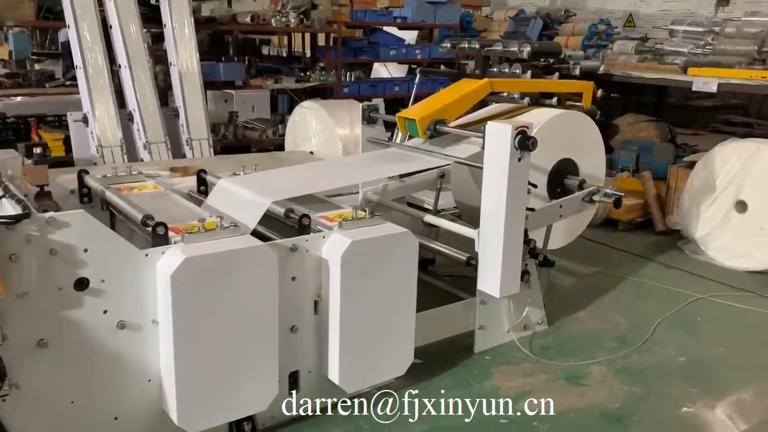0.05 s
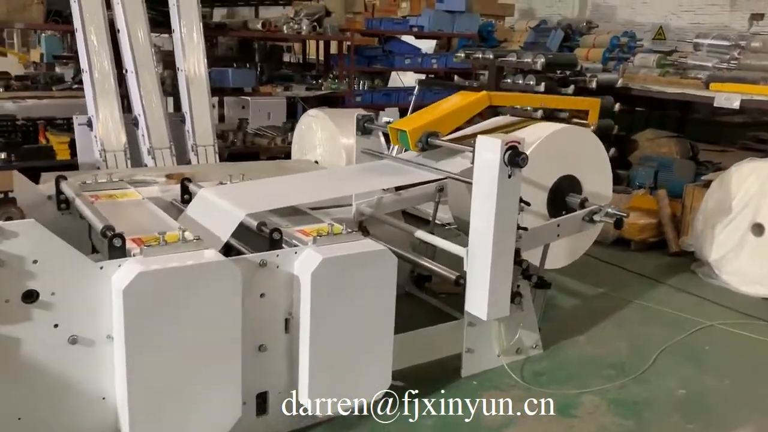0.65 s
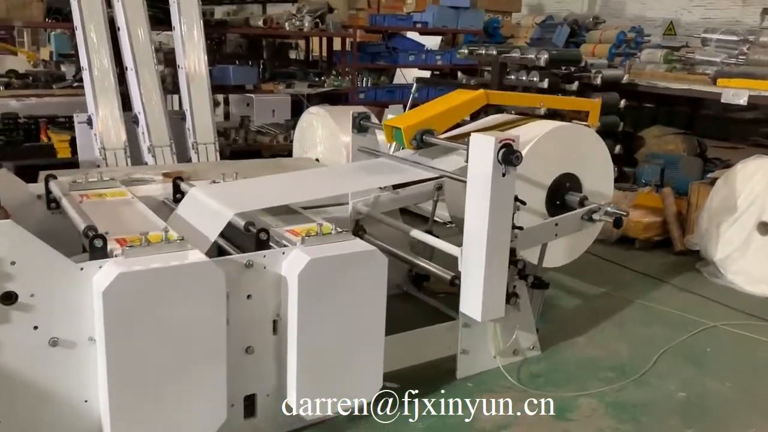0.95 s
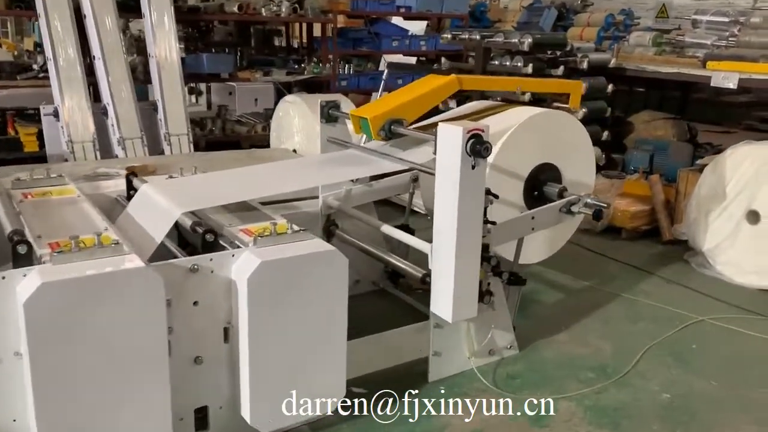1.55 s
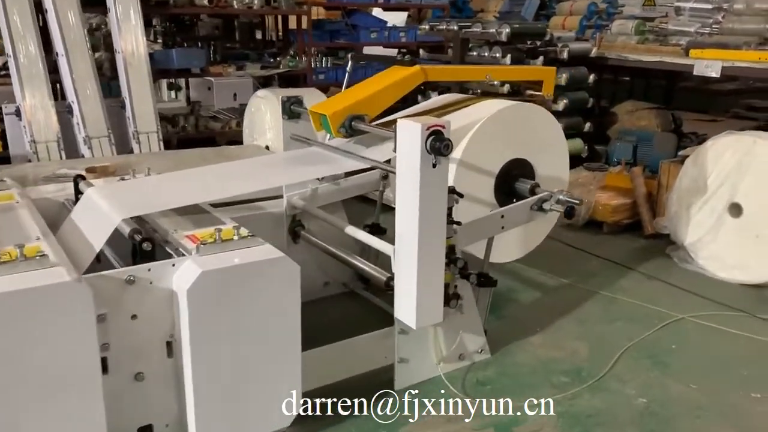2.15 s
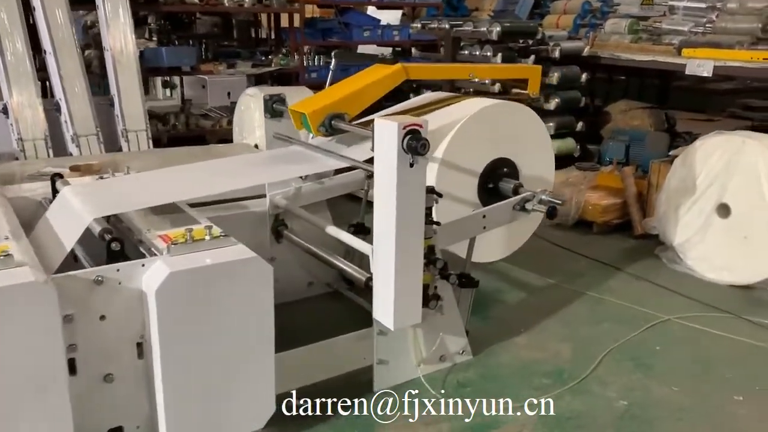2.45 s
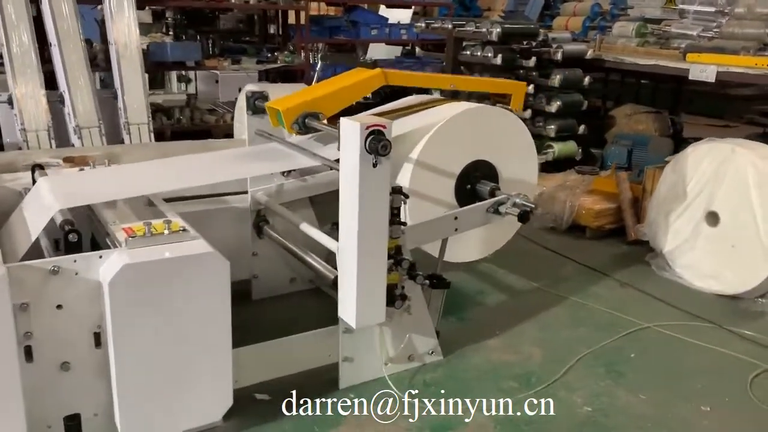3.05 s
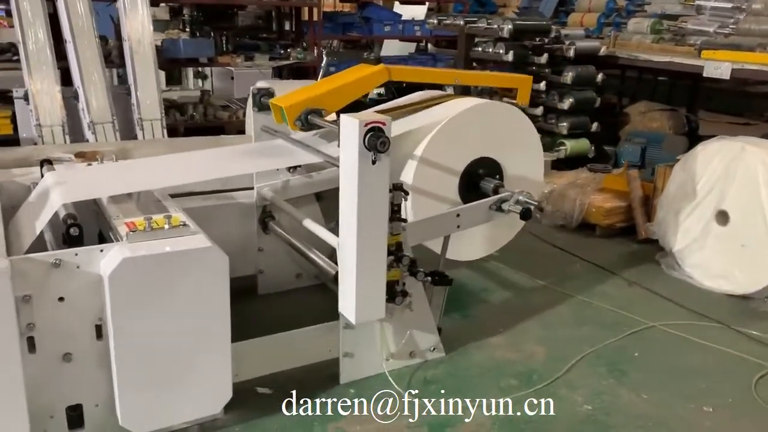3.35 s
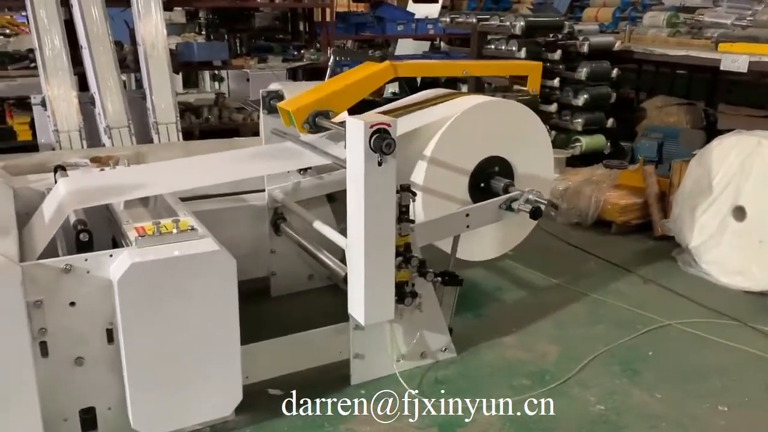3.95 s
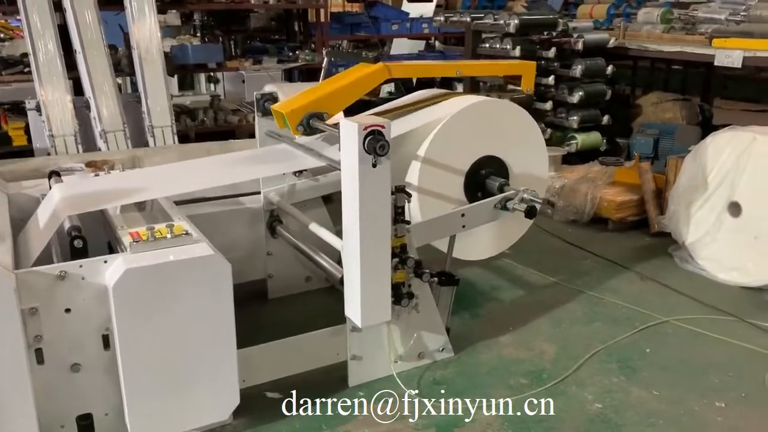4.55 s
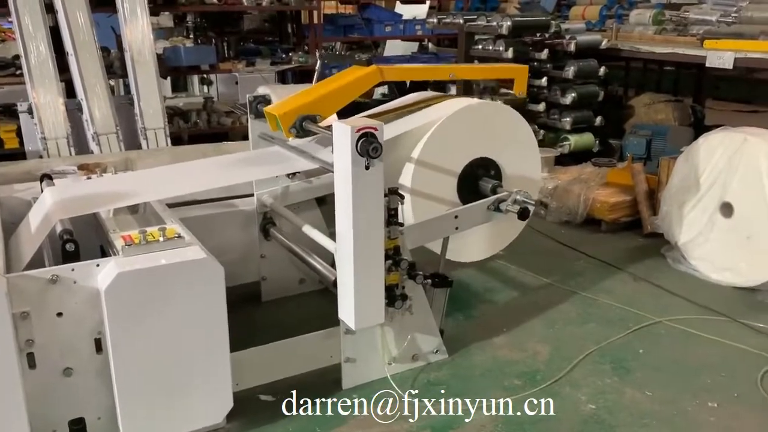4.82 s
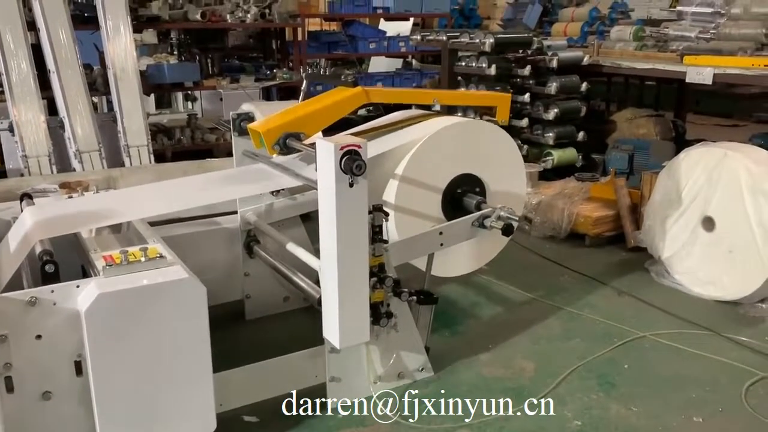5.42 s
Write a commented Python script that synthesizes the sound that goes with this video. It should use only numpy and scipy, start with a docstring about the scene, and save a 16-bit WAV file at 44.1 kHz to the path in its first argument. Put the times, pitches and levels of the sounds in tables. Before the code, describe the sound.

A paper converting machine runs steadily in a workshop, starting with a loud, throbbing hum and a metal rattle over the low rumble of the hall. A bearing whines and chirps, and paper hisses off a reel in quick pulses, ticking now and then. As the microphone moves from the drive towards the reel, the hum softens and a lower hiss grows on the right.

```python
"""First you hear a loud, throbbing hum with a metal rattle: a paper converting machine in a workshop.
Its drive hums at multiples of the machine cycle, and close tones beat. Gear teeth make the frame ring,
and a bearing whines and chirps as the paper pulls on its roller. Over the rumble of the hall, the paper
hisses off the reel, swelling twice a cycle, and ticks when it catches. The microphone is carried along
the machine from the drive towards the reel, where a lower hiss grows on the right."""
import sys
import numpy as np
from scipy import signal
from scipy.fft import rfft, irfft
from scipy.io import wavfile
from scipy.ndimage import uniform_filter1d

SR = 44100
rng = np.random.default_rng(int(sys.argv[2]) if len(sys.argv) > 2 else 0)


def store_wav(level_fs):
    """Save 16-bit WAV to argv[1]."""
    pcm = np.round(np.clip(np.atleast_2d(level_fs), -1, 1) * 32767)
    wavfile.write(sys.argv[1], SR, pcm.T.astype(np.int16))


N = 250488
T = np.arange(N) / SR
HZ = np.maximum(np.fft.rfftfreq(N, 1 / SR), 1)
CYCLES_PER_S, TEETH = 3.9094, 16  # each cycle starts with a stroke and has 16 tooth hits


def from_db(db):
    """Turn decibels into a number to multiply by."""
    return 10 ** (np.asarray(db) / 20)


def rms_one(x):
    """Scale a signal to an average power of 1."""
    return x / np.sqrt(np.mean(x ** 2) + 1e-20)


def in_time(rows):
    """Join (time, value) points into a line with a value for every sample."""
    return np.interp(T, *np.transpose(rows))


def at_hz(points, hz):
    """Read between (frequency, value) points, giving each octave equal room."""
    f, value = np.transpose(points)
    return np.interp(np.log(hz), np.log(f), value)


def drift(rate):
    """A smooth random wobble of about 1; a higher rate makes it quicker."""
    step, warm_up = 40, 4000
    r = np.exp(-2 * np.pi * rate * step / SR)
    noise = rng.standard_normal(N // step + warm_up + 2)
    slow = signal.lfilter([1], [1, -2 * r, r * r], noise)[warm_up:]
    return np.interp(np.arange(N) / step, np.arange(len(slow)), rms_one(slow))


def pan(db):
    """Left and right gains that make the left louder by db."""
    return from_db(np.array([[.5], [-.5]]) * db)


def spread(x, lead_ms):
    """One sound reaches two microphones, the left one lead_ms earlier."""
    shift = np.exp(1j * np.pi * HZ * lead_ms / 1000 * np.array([[1], [-1]]))
    return irfft(rfft(x) * shift, N)


def resonate(x, hz, width_hz):
    """Keep the band around hz by filtering twice, then scale it to power 1."""
    r = np.exp(-np.pi * 1.5 * width_hz / SR)
    stage = [1 - r, 0, r - 1, 1, -2 * r * np.cos(2 * np.pi * hz / SR), r * r]
    return rms_one(signal.sosfilt([stage, stage], x))


def swell(cycle, crest, depth_db, count):
    """A gain that rises count times a cycle; crest places one peak within the cycle."""
    return from_db(depth_db * np.cos(2 * np.pi * count * (cycle - crest)))


# The main hum along the walk (time [s], level [dB], left over right [dB])
MAIN_HUM_PATH = [(0.0, -12, 1), (1.15, -12.5, 2), (1.7, -16, -0.5), (2.15, -15.5, 2.5), (2.7, -16.5, 4),
                 (3.1, -19.5, 1.5), (3.5, -23.5, -1), (5.68, -22, 0)]
# The load kicks once a cycle, adding side tones around the hum (order [vibrations per cycle])
SIDE_TONE_ORDERS = (90, 91, 93, 94, 98, 100)
# Each side tone (level at drive [dB], level at reel [dB], delay at drive [ms], kick after stroke [s])
SIDE_TONES = [(-38, -45, 0, .03), (-45, -42, 0, .025), (-35, -29, -2.3, .033), (-31.5, -34, -.3, .018),
              (-40, -38.5, 0, .032), (-41, -37.5, 0, .021)]


def main_hum(angle, way, main_order=92, main_delay_ms=0.19):
    """The drive's loudest tone surges once a cycle, when its side tones roughly line up with it."""
    times, hum_db, pan_db = np.transpose(MAIN_HUM_PATH)
    angle_per_ms = 2 * np.pi * CYCLES_PER_S / 1000 * (1 - way)  # delays shrink towards the reel
    hum = from_db(np.interp(T, times, hum_db)) * np.cos(main_order * (angle - main_delay_ms * angle_per_ms))
    for order, (drive_db, reel_db, delay_ms, kick_s) in zip(SIDE_TONE_ORDERS, SIDE_TONES):
        since_kick = angle - 2 * np.pi * CYCLES_PER_S * kick_s
        phase = main_order * (angle - delay_ms * angle_per_ms) + (order - main_order) * since_kick
        level_db = drive_db + (reel_db - drive_db) * way + .9 * drift(3)
        hum += from_db(level_db) * np.cos(phase)
    return hum * pan(np.interp(T, times, pan_db))


# Tooth tones that form standing waves, fixed loud and quiet spots in the hall (pitch [x tooth rate])
TOOTH_TONES = (3, 4, 6, 9, 11, 12, 15)
# The walk crosses one such spot for each tone
# (level at drive [dB], level at reel [dB], time [s], dip or rise [dB], half length [s])
HALL_SPOTS = [(-22, -26.5, 2.95, -29, 0.21), (-33, -37.5, 2.2, -9.5, 0.52), (-25.5, -27.5, 2.6, 7.5, 0.68),
              (-41, -44.5, 0.11, 13, 0.19), (-48.5, -42, 2.13, 8.5, 0.72), (-37.5, -52, 2.2, 5, .6),
              (-43.5, -45, 0.12, 13, 0.27)]
# One more tooth tone fades out, then returns strongly near the reel (time [s], level [dB])
DRONE_LEVELS = [(0, -37), (1.25, -37.5), (1.85, -58), (2.25, -46), (2.6, -34), (3.25, -32), (3.9, -34.5),
                (5.68, -36)]


def tooth_hum(angle, way, drone_harmonic=10, waver_db=1.76):
    """Gear teeth hum at multiples of their hit rate; the sixth beats against the main hum."""
    hum = from_db(in_time(DRONE_LEVELS)) * np.cos(drone_harmonic * TEETH * angle)
    late_s = np.array([[.18], [-.18]])  # the left microphone reaches each spot after the right
    for harmonic, (drive_db, reel_db, spot_s, change_db, half_s) in zip(TOOTH_TONES, HALL_SPOTS):
        spot_db = change_db / (1 + ((T - spot_s - late_s) / half_s) ** 2)
        level_db = drive_db + (reel_db - drive_db) * way + spot_db + waver_db * drift(3.7)
        hum = hum + from_db(level_db) * np.cos(harmonic * TEETH * angle)
    return hum * pan(3)


# Shaft and gear tones before trim_db
# (order [vibrations per cycle], level at drive [dB], level at reel [dB])
GEAR_TONES = [(11, -58, -57), (28, -48, -46), (32, -47, -48), (38, -49, -52), (39, -46, -41),
              (46, -39, -41.5), (47, -46, -42), (49, -46, -44), (50, -44, -44), (67, -44, -42),
              (74, -44, -46), (80, -44, -50), (86, -43, -46), (106, -44, -44), (112, -39, -46),
              (123, -52, -42), (141, -48, -45), (128, -40, -40.5), (184, -48, -55), (224, -42, -54),
              (232, -48, -45), (272, -38, -49), (336, -44, -46), (366, -45, -51), (384, -45, -51),
              (432, -50, -50)]
# The drive is heard mostly on the left (frequency [Hz], left over right [dB])
DRIVE_BALANCE = [(150, 4.5), (360, 9.5), (560, -3), (625, 13.5), (700, 29), (930, 3), (1300, 9), (1500, 2),
                 (2200, 1.5)]


def drive(cycle, way, trim_db=-1.46):
    """The turning drive makes both hums, plus weaker wavering tones from its shafts and gears."""
    angle = 2 * np.pi * cycle
    hum = main_hum(angle, way) + tooth_hum(angle, way)
    for order, drive_db, reel_db in GEAR_TONES:
        level_db = drive_db + (reel_db - drive_db) * way + trim_db + 2.2 * drift(1.2)
        tone = from_db(level_db) * np.cos(order * angle + rng.uniform(0, 2 * np.pi))
        hum += tone * pan(at_hz(DRIVE_BALANCE, order * CYCLES_PER_S))
    return spread(np.sqrt(2) * hum, lead_ms=0.21)


# The notes the frame rings at (pitch [Hz], width [Hz], level at drive [dB], level at reel [dB])
FRAME_NOTES = [(493.4, 24, -57, -38), (573, 31, -34.5, -47.5), (613, 50, -46, -44), (751.6, 17, -40, -50.5),
               (792, 78, -48.5, -41.5), (878, 38, -34, -43), (930, 35, -39, -41), (1087, 50, -34.5, -40.5),
               (1303, 54, -35.5, -46), (1456, 60, -34.5, -43.5), (1695, 26, -41, -46),
               (1873, 24, -42, -42.5), (2180, 137, -37.5, -38)]


def frame_rattle(cycle, way, tooth_db=10, hall_share=0.74):
    """Each tooth gives the frame a short, rough push; the hall adds different noise on each side."""
    push = swell(cycle, 0, tooth_db, count=TEETH) * rng.standard_normal(N)
    force = spread(rms_one(push), lead_ms=0.18) + hall_share * rng.standard_normal((2, N))
    rattle = 0
    for hz, width_hz, drive_db, reel_db in FRAME_NOTES:
        gain = from_db(drive_db + (reel_db - drive_db) * way)
        rattle += gain * resonate(force, hz, width_hz) * pan(at_hz(DRIVE_BALANCE, hz))
    return rattle * swell(cycle, 0.42, 1.0, count=2)


# A ringing metal part along the walk (time [s], level [dB])
RING_LEVELS = [(0, -41.5), (.45, -40.5), (.85, -46), (1.35, -42), (1.8, -35.5), (2.05, -40.5), (2.5, -35.5),
               (3.05, -56), (3.5, -41), (4.0, -40), (5.68, -40)]


def metal_ring(cycle, harmonic=18, pulse_db=3.5, rough=0.79):
    """The teeth keep a metal part ringing with a slightly rough tone that swells once a cycle."""
    tone = np.sqrt(2) * np.cos(2 * np.pi * harmonic * TEETH * cycle)
    blur = resonate(rng.standard_normal((2, N)), harmonic * TEETH * CYCLES_PER_S, width_hz=24)
    ring = rms_one(spread(tone, lead_ms=0.13) + rough * blur)
    return from_db(in_time(RING_LEVELS)) * swell(cycle, 0.84, pulse_db, count=1) * ring * pan(5)


# The tone colour of the hall (frequency [Hz], relative level [dB])
HALL_COLOUR = [(22, -24), (32, -30), (42, -12.5), (60, -21.5), (90, -14.5), (130, -13.5), (175, -6.5),
               (230, -12), (350, -2.5), (560, -9.5), (1000, -14), (1600, -15), (3200, -17), (6000, -27.5)]
# How alike the two sides sound (frequency [Hz], likeness [-1 to 1])
HALL_LIKENESS = [(40, .92), (130, .87), (300, .85), (550, .62), (900, .3), (1600, -.2), (2400, -.15),
                 (3200, -.1), (6000, 0)]
# Which side is louder (frequency [Hz], left over right [dB])
HALL_BALANCE = [(60, 0), (300, 1), (550, 2), (800, 5), (1400, 3.5), (2500, 1.5), (5000, -1)]


def hall(rumble_db, clatter_db, split_hz=300):
    """Low rumble and far clatter blur into noise, alike on both sides only in the bass."""
    shared, opposite = rfft(rng.standard_normal((2, N)))
    alike = at_hz(HALL_LIKENESS, HZ)
    spectrum = np.sqrt(1 + alike) * shared + np.sqrt(1 - alike) * opposite * [[1], [-1]]
    spectrum *= pan(at_hz(HALL_BALANCE, HZ)) * from_db(at_hz(HALL_COLOUR, HZ))
    spectrum /= (1 + (14 / HZ) ** 4) * (1 + (HZ / 7500) ** 4)  # soften the lowest and highest sounds
    whole = rms_one(irfft(spectrum, N))
    bass = irfft(rfft(whole) / (1 + (HZ / split_hz) ** 4), N)
    return bass * from_db(rumble_db) + (whole - bass) * from_db(clatter_db)


# Swings in how tight the paper is (count [per cycle], peak position [cycles], depth [dB])
TENSION_SWINGS = [(1, .56, .5), (2, .385, .8), (3, .28, .22), (4, .15, .18)]


def paper_pulls(cycle):
    """Tension swells the hiss twice a cycle, unevenly; it dips briefly just after the stroke."""
    swings = [swell(cycle, crest, depth_db, count) for count, crest, depth_db in TENSION_SWINGS]
    return np.prod(swings, axis=0)


# The paper's hiss along the walk, before trim_db (time [s], level [dB])
HISS_LEVELS = [(0.0, -27.5), (0.9, -31), (3.1, -31), (5.2, -30.5), (5.68, -27.5)]
# The tone colour of that hiss (frequency [Hz], relative level [dB])
PAPER_COLOUR = [(2000, -20), (3300, -12), (4100, -9), (5200, -13.5), (6500, -7.5), (8200, .6), (11400, -.6),
                (12600, -4), (15500, -6.5)]
PAPER_LEAD_MS = -.26  # negative: the right side hears it first


def paper_hiss(cycle, hiss_db, trim_db=0.6, grain_db=1.4, split_hz=9700):
    """Paper rubs off the reel in fine grains, louder at each pull; lows and highs rustle separately."""
    gain = paper_pulls(cycle) * from_db(hiss_db + trim_db + .35 * drift(14))
    rub = rms_one(rng.standard_normal(N) * from_db(grain_db * drift(310)))
    stereo = spread(rub, PAPER_LEAD_MS) + .33 * rng.standard_normal((2, N))
    colour = from_db(at_hz(PAPER_COLOUR, HZ)) / (1 + (2000 / HZ) ** 4)
    hiss = rms_one(irfft(rfft(stereo) * colour, N))
    lower = irfft(rfft(hiss) / (1 + (HZ / split_hz) ** 16), N)
    rustle = lower * from_db(.7 * drift(25)) + (hiss - lower) * from_db(1.1 * drift(20))
    return gain * rustle * pan(-0.12)


# The bearing's faint whine, before trim_db (time [s], level [dB])
WHINE_LEVELS = [(0, -43.5), (.3, -35), (.75, -43), (1.25, -40), (1.95, -46), (2.5, -38.5), (3.1, -42.5),
                (4.3, -39.5), (5.68, -38)]
# Its chirps as the paper pulls on the roller, before trim_db
# (middle time [s], level [dB], length [s], pitch [Hz])
BEARING_CHIRPS = [(0.065, -26.5, 0.035, 2524), (0.118, -27.5, 0.036, 2532), (0.17, -28, 0.037, 2532),
                  (0.235, -28.5, 0.02, 2508), (.375, -26.5, .06, 2526), (0.623, -34, 0.052, 2480),
                  (0.876, -35, 0.065, 2485), (1.0, -31.5, 0.055, 2512), (1.133, -34.5, 0.047, 2510),
                  (1.25, -30.5, 0.072, 2523), (1.387, -32.5, 0.036, 2515), (1.618, -33.5, .1, 2504),
                  (2.162, -32, 0.04, 2480), (2.419, -31, .05, 2500), (2.49, -32.5, 0.039, 2510),
                  (2.55, -29, 0.029, 2510), (2.671, -30.5, 0.065, 2512), (2.81, -34, 0.069, 2490),
                  (2.93, -29.5, 0.064, 2524), (3.09, -33, 0.042, 2508), (3.182, -32.5, 0.067, 2505),
                  (3.413, -31.5, 0.051, 2500), (3.576, -34, 0.051, 2533), (3.68, -33, 0.054, 2515),
                  (3.801, -34, 0.044, 2520), (3.943, -34, .06, 2505), (4.05, -31.5, .04, 2520),
                  (4.198, -31.5, 0.059, 2500), (4.315, -33.5, .08, 2540), (4.711, -31.5, .05, 2510),
                  (4.88, -35, 0.035, 2500), (4.959, -35, 0.024, 2500), (5.226, -35, .06, 2505),
                  (5.48, -35, 0.043, 2508)]


def bearing(cycle, way, whine_hz=2515, trim_db=-1.0, tooth_db=4, rough=0.59):
    """A wavering whine, shaken by the gear teeth, flares into chirps over a slightly lower noise."""
    power = from_db(in_time(WHINE_LEVELS)) ** 2
    weighted_hz = power * whine_hz
    for middle_s, db, length_s, hz in BEARING_CHIRPS:
        chirp = from_db(db) ** 2 * .5 ** np.minimum((2 * (T - middle_s) / length_s) ** 2, 20)
        power += chirp
        weighted_hz += chirp * hz
    pitch_hz = weighted_hz / power + 10 * drift(30)  # the loudest part steers the pitch
    tone = np.sqrt(2) * np.sin(2 * np.pi * np.cumsum(pitch_hz) / SR)
    tone *= swell(cycle, 0, tooth_db, count=TEETH)
    blur = resonate(rng.standard_normal((2, N)), whine_hz, width_hz=45)
    whine = from_db(trim_db) * np.sqrt(power) * rms_one(spread(tone, lead_ms=.11) + rough * blur)
    noise = resonate(rng.standard_normal((2, N)), hz=2465, width_hz=70)
    noise *= from_db(-38.5 - 3 * way) * swell(cycle, 0.25, 0.98, count=2)
    return (whine + noise) * pan(3.4)


def burst(start_s, db, decay_s):
    """A gain that jumps up and dies away."""
    return from_db(db) * (T >= start_s) * np.exp(-np.maximum(T - start_s, 0) / decay_s)


# The paper catches (time [s], level before smoothing [dB], decay [s], centre [Hz], width [Hz])
PAPER_CATCHES = [(.611, -17.5, .013, 10000, 10000), (.627, -29, .025, 8000, 3000),
                 (.653, -25, .002, 5500, 3000), (.762, -21, .02, 10000, 10000),
                 (4.086, -28, .01, 2500, 1200), (4.113, -29, .012, 1900, 900), (1.9, -31, .03, 9500, 4000),
                 (3.44, -30, .025, 9500, 4000), (4.471, -27, .025, 9500, 3000)]


def paper_ticks(crackle_db=2):
    """Each catch is a crackle that builds for a few milliseconds and dies away in its own band."""
    crackle = rng.standard_normal(N) * from_db(crackle_db * drift(900))
    stereo = spread(crackle, PAPER_LEAD_MS) + .4 * rng.standard_normal((2, N))
    return sum(uniform_filter1d(burst(s, db, decay_s), size=300) * resonate(stereo, hz, width_hz)
               for s, db, decay_s, hz, width_hz in PAPER_CATCHES)


# The reel scrapes once (time [s], level relative to its hiss [dB], decay [s])
REEL_SCRAPES = [(4.06, 5, 0.024)]


def reel(cycle, far_db=-41.5, near_db=-33.5, halfway_s=5.07, rise_s=0.99):
    """The turning reel scrapes and gives a lower hiss that grows as the microphone comes round to it."""
    nearness = .5 + .5 * np.tanh((T - halfway_s) / rise_s)
    level_db = far_db + (near_db - far_db) * nearness + .7 * drift(18)
    rub = rng.standard_normal((2, N)) + .81 * rng.standard_normal(N)  # partly shared by both sides
    hiss = resonate(rub, hz=4900, width_hz=2600)
    scrape = sum(burst(*row) for row in REEL_SCRAPES)
    return from_db(level_db) * (1 + scrape) * paper_pulls(cycle) * hiss * pan(-4)


# The microphone's walk (time [s], way along the machine [0 = drive, 1 = reel])
MICROPHONE_WALK = [(0, 0.097), (.6, 0.39), (1.6, 0.63), (3.1, 0.9), (5.68, 1)]


def scene(first_stroke_s=.039):
    """Drive, frame, bearing and paper all follow one slightly unsteady machine cycle."""
    cycle = CYCLES_PER_S * (T - first_stroke_s) + 0.00062 * drift(2.13)
    way = in_time(MICROPHONE_WALK)
    hiss_db = in_time(HISS_LEVELS)
    swing_db = hiss_db - hiss_db.mean()  # the hall rises and falls with the hiss
    rumble_db = -21.5 + swing_db
    clatter_db = -28 + .91 * swing_db + .8 * drift(25)
    machine = drive(cycle, way) + frame_rattle(cycle, way) + metal_ring(cycle) + bearing(cycle, way)
    paper = paper_ticks() + paper_hiss(cycle, hiss_db) + reel(cycle)
    return machine + paper + hall(rumble_db, clatter_db)


def record(dry):
    """A steep filter cuts the treble above 15700 Hz."""
    return signal.sosfilt(signal.ellip(12, .1, 90, 15700, fs=SR, output="sos"), dry)


dry = scene()
out = record(dry)
store_wav(out)
```